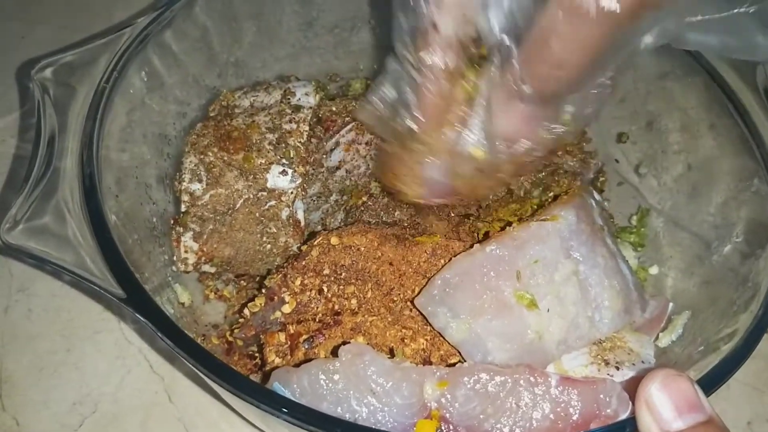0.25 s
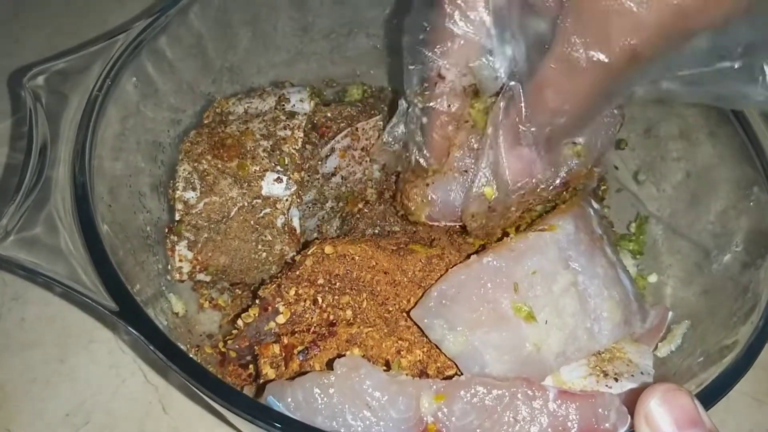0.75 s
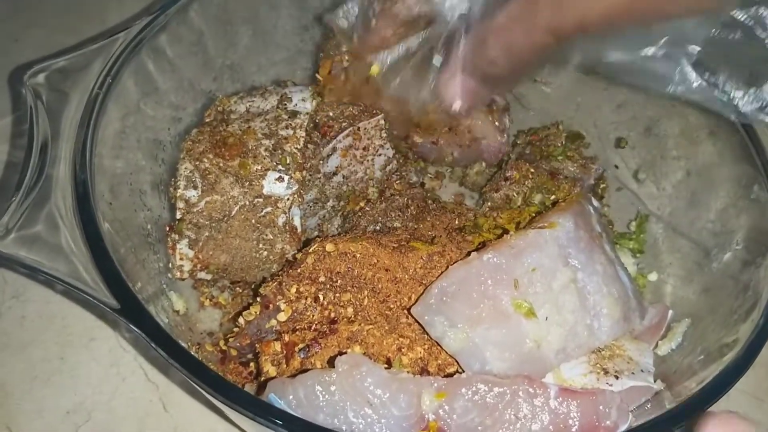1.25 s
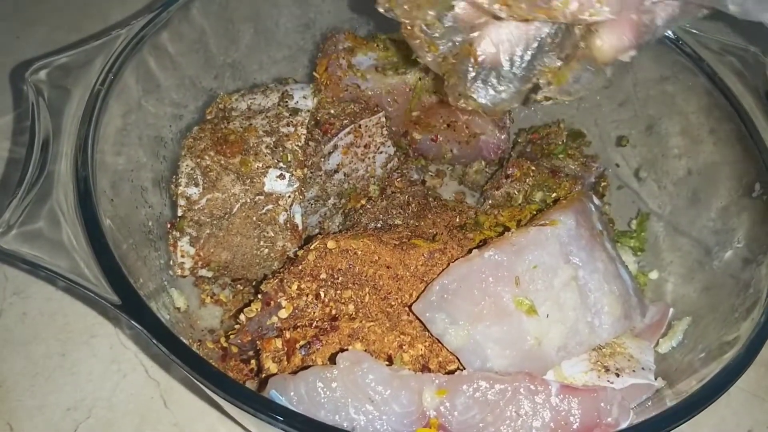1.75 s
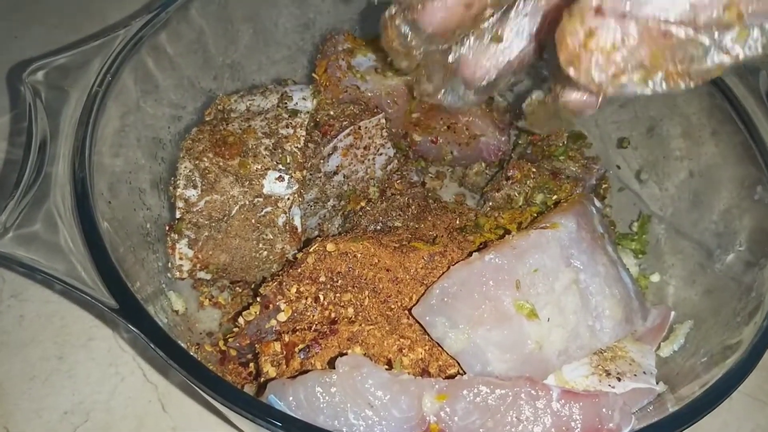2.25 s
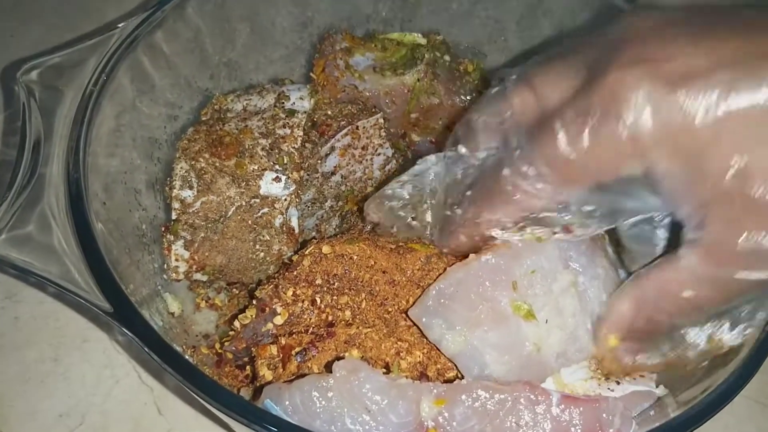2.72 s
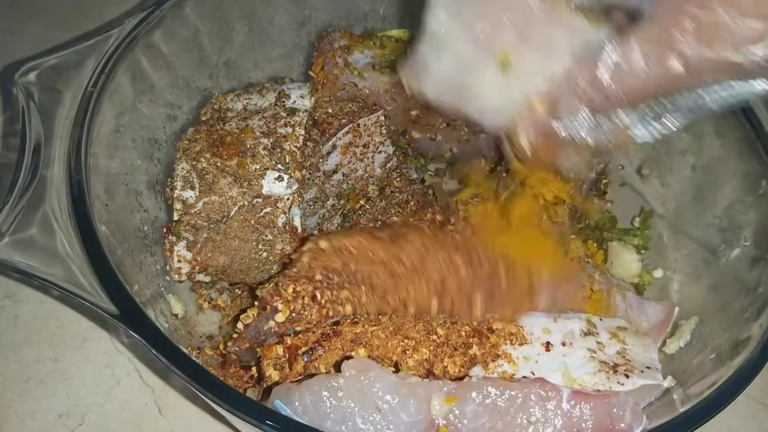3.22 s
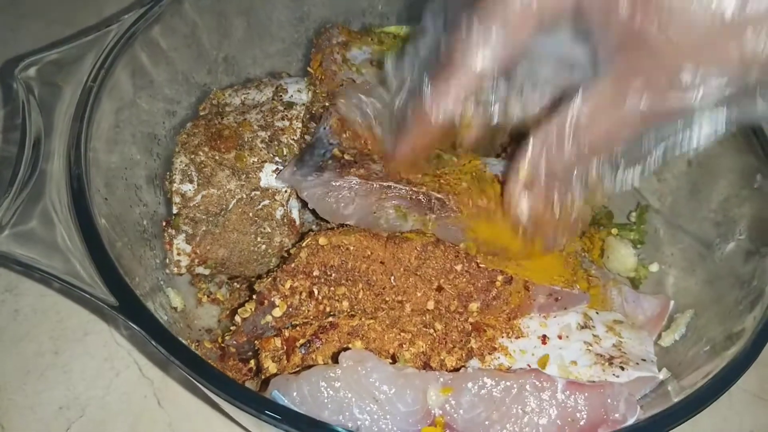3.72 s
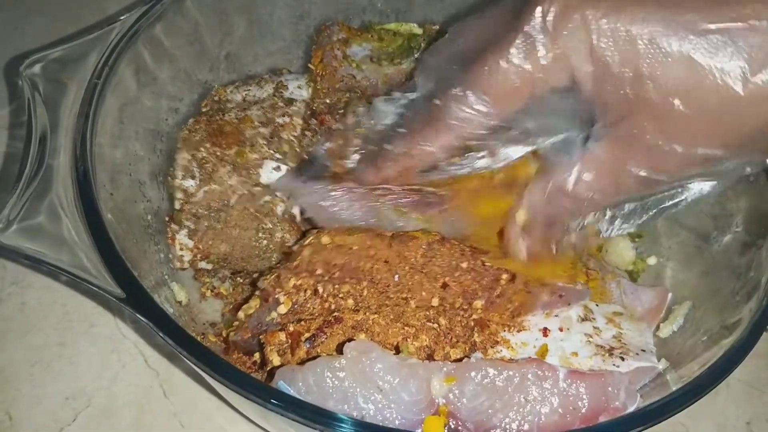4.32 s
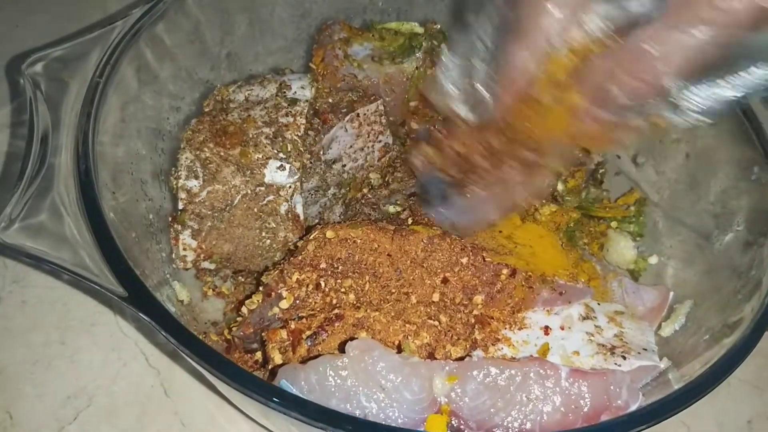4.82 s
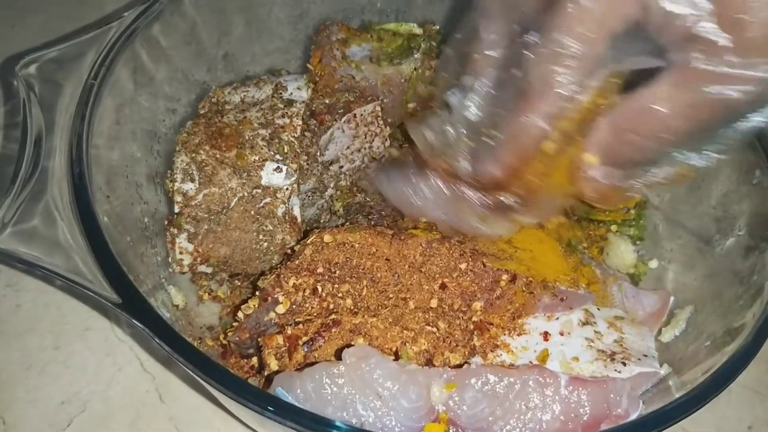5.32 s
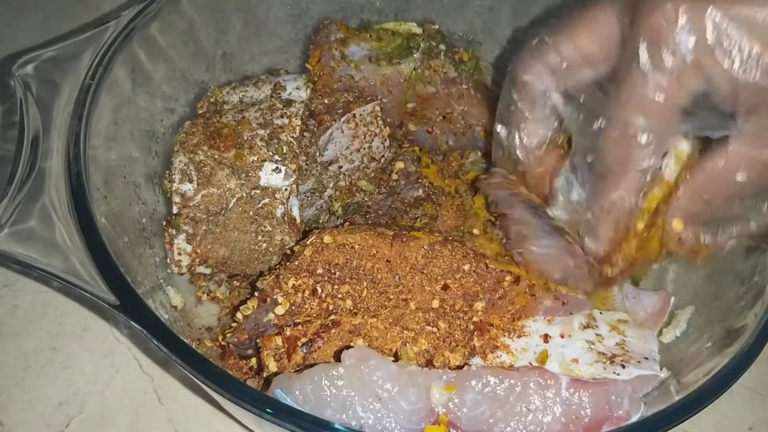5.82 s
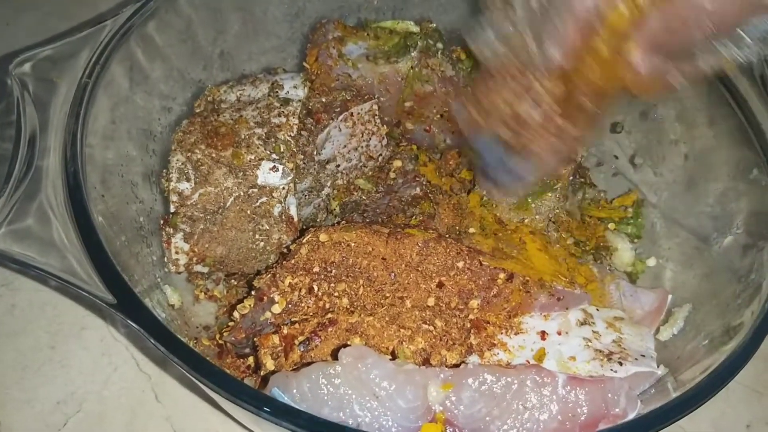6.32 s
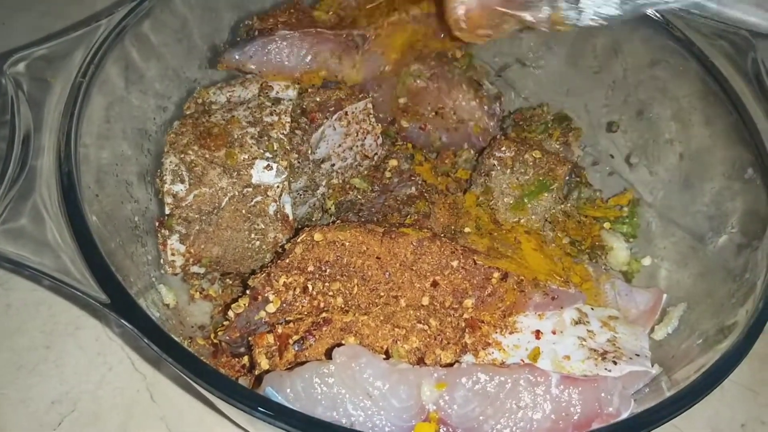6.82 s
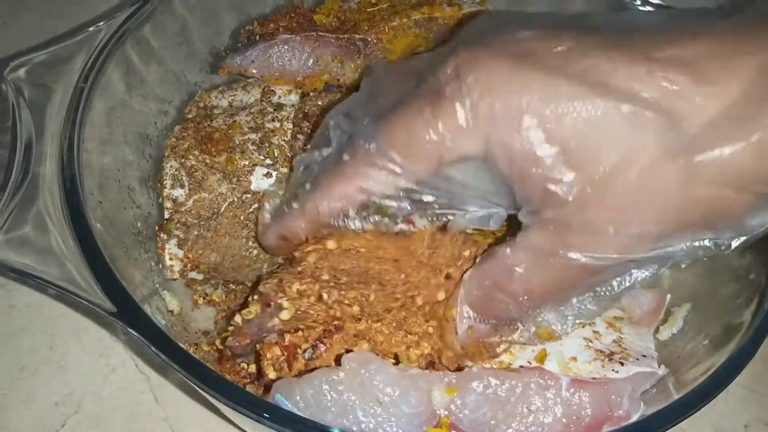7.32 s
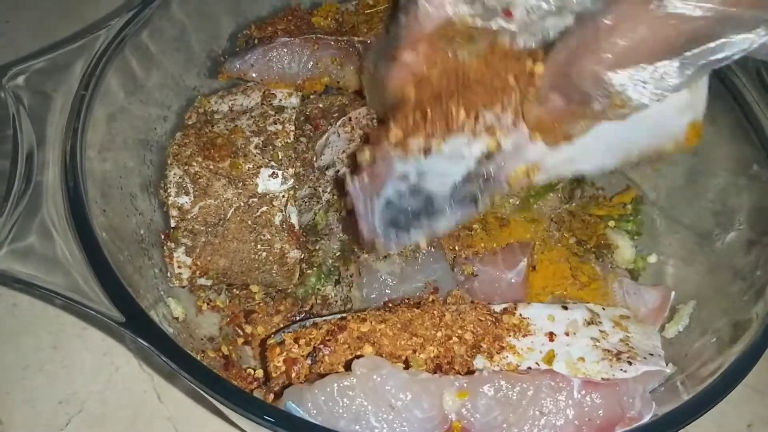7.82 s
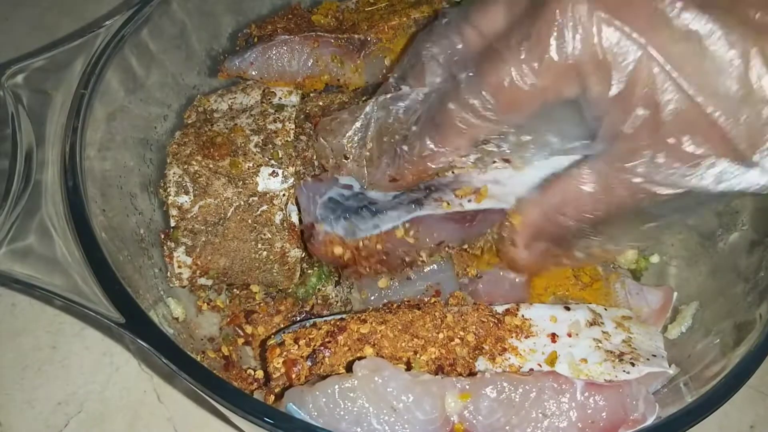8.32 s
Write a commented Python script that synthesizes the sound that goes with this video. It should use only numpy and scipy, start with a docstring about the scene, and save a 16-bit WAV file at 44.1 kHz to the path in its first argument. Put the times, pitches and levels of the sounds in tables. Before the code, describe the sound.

A hand in a thin plastic glove works close to the microphone, turning fish in dry spice in a glass bowl. The film crinkles in short, bright bursts, first sparse, then fuller after two seconds, with a few sharp ticks. A low fan hum fills the kitchen, with a faint thin hiss and a distant engine rising and falling.

```python
"""A fan hums in a kitchen over a faint rustle of film, then a gloved hand turns fish in dry spice in a glass bowl.
The thin plastic glove is close: its film buckles in thousands of random snaps that scatter in bowl and kitchen.
A few creases tick alone as short ringing sines, and a few low, narrow swells of noise come and go.
Shaped noise and wavering sines make the fan, narrow hiss a thin whine; an engine far outside rises and falls
as a firing note with its third harmonic."""
import sys
import numpy as np
from scipy import signal
from scipy.fft import rfft, irfft
from scipy.io import wavfile

SR = 44100
rng = np.random.default_rng(int(sys.argv[2]) if len(sys.argv) > 2 else 0)


def put_to_file(sound):
    """Save the sound as 16-bit audio at rate SR, in the file named by the first command-line argument."""
    columns = np.atleast_2d(sound).T  # one column per channel
    safe = np.clip(columns, -1, 1)
    whole_steps = np.round(safe * 32767)
    wavfile.write(sys.argv[1], SR, whole_steps.astype(np.int16))


N = 377055
T = np.arange(N) / SR  # seconds
HZ = np.fft.rfftfreq(N, 1 / SR) + 1e-9  # kept above zero for the logarithm
MIDDLING_DB = -44.5  # crinkle level of a middling effort


def undb(db):
    """Decibels to gain."""
    return 10 ** (np.asarray(db) / 20)


def unit(x):
    """Scale to rms 1."""
    return x / np.sqrt(np.mean(x ** 2))


def curves(rows):
    """Draw each column of a (start_s, ..) table as straight lines, sample by sample."""
    s, *columns = np.transpose(rows)
    return [np.interp(T, s, c) for c in columns]


def response(points):
    """Gain at every frequency from (pitch_hz, level_db) points, joined on a logarithmic pitch scale."""
    hz, db = np.transpose(points)
    return undb(np.interp(np.log(HZ), np.log(hz), db))


def walk(rate):
    """Smooth chance of rms 1 that heads for a new random value rate times a second."""
    return unit(np.interp(T * rate, np.arange(4096), rng.standard_normal(4096)))


def ring(spectrum, hz, width):
    """Sound of a spectrum through a resonance with steep, bell-shaped skirts; rms 1."""
    return unit(irfft(spectrum * np.exp(-((HZ - hz) / width) ** 2), N))


def fan():
    """Moving air rings the room's low resonances; the motor's tones swell and waver on top."""
    # colour of the air noise before the room rings: pitch_hz [Hz], level_db [dB, relative]
    air_colour = [(20, -25), (45, -7.5), (70, -3), (95, -1), (190, -1.5), (215, -8), (270, -2), (325, -2),
                  (400, -7.5), (480, -19), (900, -20.5), (1300, -27.5), (4000, -31), (15000, -54)]
    # room resonances: pitch_hz [Hz], width_hz [Hz, where half the dB boost is left], boost_db [dB]
    room_modes = [(54, 4.9, 0.5), (102, 4.7, 8), (138, 7, -2.5), (167.2, 22, 2.5), (183.2, 7.3, 5.5),
                  (263.2, 6.2, 7), (280.4, 9, 3), (290.6, 8.7, 4), (312, 15, 1), (350, 6.8, -1),
                  (378, 9.4, 0), (417, 10, -1), (674, 41, 6.5), (1590, 68, 6.5)]
    # motor tones, before they swell: pitch_hz [Hz], level_db [dB rms]
    motor_tones = [(61.8, -60.5), (123.7, -55.5), (200, -62.5), (232, -62.5), (309.2, -57), (494, -70),
                   (800.5, -74)]
    air_db = -42.5  # rms of the part that both sides share

    gain = response(air_colour)
    for hz, width, db in room_modes:
        gain = gain * undb(db / (1 + (2 * (HZ - hz) / width) ** 2))
    # the bass is nearly alike at both microphones, the treble spreads wide
    width = response([(40, -14), (150, -19.5), (320, -13.5), (600, -3.5), (1500, 1.0), (4000, 1.0)])
    noise = rfft(rng.standard_normal((2, N)))
    mid, side = irfft(noise * gain * [np.ones(len(HZ)), width], N)
    air = (mid + side * np.array([[1], [-1]])) / np.std(mid)

    hum = 0
    for hz, db in motor_tones:
        swell = undb(db + 3.8 * walk(3.6))
        waver = 0.33 * walk(4)  # radians
        hum = hum + swell * np.sqrt(2) * np.sin(2 * np.pi * hz * T + waver)
    return air * undb(air_db) + hum


def whine():
    """Two steady, narrow bands of noise make a thin, hissy whine."""
    # bands of hiss: pitch_hz [Hz], width_hz [Hz, middle to 1/e], level_db [dB rms]
    hiss_bands = [(5350, 100, -73), (6360, 110, -68.5)]
    hiss = rfft(rng.standard_normal((2, N)))
    return sum(undb(db) * ring(hiss, hz, width) for hz, width, db in hiss_bands)


def engine():
    """Only the firing note and its third harmonic get through the walls; both swell when the engine pulls."""
    # pulls: middle_s [s], length_s [s], firing_hz [Hz], note_db [dB rms], third_harmonic_db [dB rms before waver]
    pulls = [(1.846, 0.62, 28.2, -68, -48.5), (2.597, 0.67, 31.4, -50, -52), (3.6, 0.43, 32, -55, -51),
             (5.55, .6, 28.7, -57, -46), (6.098, 0.79, 30.2, -54, -47), (7.155, 1.0, 32.5, -49, -58),
             (7.6, 0.6, 33.3, -55, -47.5), (8.4, 0.49, 30.27, -48.5, -62)]
    idle_third_db = -59  # between pulls only the third harmonic is heard

    hz, = curves([(s, rate) for s, _, rate, _, _ in pulls])
    note_power, third_power = 0, undb(idle_third_db) ** 2
    for s, length, _, note_db, third_db in pulls:
        pull = np.exp(-(2 * (T - s) / length) ** 2)
        note_power = note_power + pull * undb(note_db) ** 2
        third_power = third_power + pull * undb(third_db) ** 2
    phase = 2 * np.pi * np.cumsum(hz) / SR + 0.054 * walk(18)
    note = np.sqrt(2 * note_power) * np.sin(phase)
    third = np.sqrt(2 * third_power) * undb(1.1 * walk(5.4)) * np.sin(3 * phase)
    return note + third


def stroke(start, length):
    """Power of one rub: the fingers take hold of the film, rub in a gentle arch and let go."""
    attack_s, release_s = 0.012, 0.0098  # time constants
    arch_db = 1.5  # a stroke is fastest, and so loudest, in its middle
    from_middle = np.clip(2 * (T - start) / length - 1, -1, 1)
    arch = undb(arch_db * (1 / 3 - from_middle ** 2)) ** 2
    attack = (1 + np.tanh((T - start) / (2 * attack_s))) / 2
    release = (1 + np.tanh((start + length - T) / (2 * release_s))) / 2
    return arch * attack * release


def hand():
    """Strokes add power to the grip's rustle; gives effort and shares of broad and fine folds, all in dB."""
    # rustle between strokes, faint from the fingertips, fuller from the whole hand:
    # start_s [s], crinkle_db [dB, before fidgeting]
    grip = [(0, -49), (.15, -56.5), (.95, -55), (1.3, -53), (1.62, -60.5), (1.95, -42.5), (3.3, -42),
            (3.9, -46), (4.6, -45), (5.1, -44.5), (5.5, -47), (6.3, -45.5), (7.25, -42.5), (7.8, -44),
            (8.55, -42.3)]
    # rubs and squeezes: start_s [s], length_s [s], crinkle_db [dB, before the arch],
    # broad_slack_db and fine_taut_db [dB, relative to the middling folds]
    strokes = [(0.367, 0.056, -40, -9, 0), (0.444, .12, -44, -10.5, -3), (0.658, 0.043, -49.5, -10, 0),
               (1.03, 0.27, -43, -13, -2.5), (1.113, 0.035, -35.5, -11.5, -0.5),
               (1.675, 0.061, -45.5, -18, -2), (1.8, 0.15, -47, -12, -1.5), (1.963, 0.24, -37, -14, 0),
               (2.075, 0.044, -34, -20, 4), (2.398, 0.058, -39, -28, 0.5), (2.475, 0.13, -40, -11, -5),
               (2.662, 0.071, -36, -19.5, -1), (2.81, .052, -40.5, -9, -3), (2.98, 0.14, -40.5, -18.5, -6),
               (3.431, 0.095, -37.5, -16.5, 1), (3.561, 0.056, -40, -15.5, 0.5),
               (3.701, 0.034, -36.5, -15.5, -2), (3.987, 0.073, -41.5, -11, -1),
               (4.155, 0.078, -36.5, -11.5, -0.5), (4.264, .21, -39, -11.5, -0.5),
               (4.564, .04, -37, -18, 1.5), (4.63, 0.05, -36, -14.5, 3), (4.701, .345, -40.5, -15.5, -.5),
               (5.362, 0.034, -37, -17, -3), (5.694, 0.042, -34.5, -13, -1.5), (5.83, 0.056, -40.5, -20, 1),
               (6.013, 0.065, -35.5, -14.5, -3), (6.177, .05, -40.5, -15, -1), (6.437, 0.24, -45, -29, 3),
               (6.835, 0.044, -41.5, -13, -.5), (6.943, 0.097, -38.5, -13, -4),
               (7.087, 0.057, -37.5, -11.5, -3), (7.506, 0.16, -41.5, -16, 1.5),
               (7.9, 0.075, -37, -11.5, 1), (8.209, .068, -33.5, -13, -.5)]
    fidget_db, fidget_per_s = 1.02, 26  # small finger movements vary the rustle
    grip_broad_db, slack_db_per_db = -11.5, 0.5  # a looser grip leaves more broad folds
    grip_fine_db = 0.1

    grip_db, = curves(grip)
    grip_db = grip_db + fidget_db * walk(fidget_per_s)
    power = undb(grip_db) ** 2
    broad = power * undb(grip_broad_db - slack_db_per_db * (grip_db - MIDDLING_DB)) ** 2
    fine = power * undb(grip_fine_db) ** 2
    for start, length, db, broad_db, fine_db in strokes:
        rub = undb(db) ** 2 * stroke(start, length)
        power = power + rub
        broad = broad + rub * undb(broad_db) ** 2
        fine = fine + rub * undb(fine_db) ** 2
    return 10 * np.log10([power, broad / power, fine / power])


def snaps(per_second, spread_db):
    """Energy of buckling snaps at random moments, many small and a few large; mean 1."""
    happens = rng.random(N) < per_second / SR
    size = undb(spread_db * np.minimum(rng.exponential(size=N), 3.5))
    energy = happens * size ** 2 / per_second  # more snaps share the same energy
    return energy / energy.mean()


def fade(energy, t60):
    """Spread energy over an exponential tail that falls 60 dB in t60 seconds."""
    keep = np.exp(-np.log(1e6) / (t60 * SR))
    return signal.lfilter([1 - keep], [1, -keep], energy)


def scatter(energy, snap_t60, bowl_t60, bowl_db, room_t60, room_db):
    """Amplitude of snaps with their reflections off the glass and the kitchen's tail."""
    snap = fade(energy + 1e-18, snap_t60)
    glass = fade(energy * undb(bowl_db) ** 2 + 1e-18, bowl_t60)
    kitchen = fade(energy * undb(room_db) ** 2 + 1e-18, room_t60)
    return np.sqrt(snap + glass + kitchen)


def shifting_colour(x, gain, drift_s):
    """Three delayed copies with randomly wandering lags make the crinkle's colour keep shifting."""
    out = x
    for lag in (.0007, .0019, .0037):  # seconds
        out = out + gain * np.interp(T - lag - drift_s * walk(7), T, x)
    return unit(out)


def glove():
    """The film buckles in little avalanches, thicker and louder as the hand presses, and its folds ring."""
    # bands in which the folds ring, broad folds first:
    # pitch_hz [Hz], width_hz [Hz, middle to 1/e], level_db [dB, before the folds vary]
    film_bands = [(840, 500, -5.5), (1786, 390, -4.5), (2318, 307, -7.5), (2830, 440, -15.5),
                  (3720, 775, -13.5), (4870, 1000, -11.5), (5950, 910, -16), (7134, 930, -10.5),
                  (8840, 1150, -12.5), (10770, 1450, -10.5), (12900, 1340, -10.5), (15460, 1560, -12)]
    broad_wander_db, fine_wander_db = 0.5, 0.55  # the mix of folds drifts as the glove shifts

    effort_db, broad_db, fine_db = hand()
    broad_db = broad_db + broad_wander_db * walk(8.9)
    fine_db = fine_db + fine_wander_db * walk(8)
    rate = 3500 * undb(.6 * (effort_db - MIDDLING_DB))  # snaps per second
    avalanches = undb(3.3 * walk(80) + 2.1 * walk(300))
    energy = snaps(rate, spread_db=4.0) * avalanches
    crackle = unit(scatter(energy, snap_t60=0.0015, bowl_t60=0.01, bowl_db=-8, room_t60=0.21, room_db=1.5))
    # every snap starts from another spot, so it reaches each microphone by its own paths
    both_paths = rng.standard_normal((2, N))
    film = rfft([shifting_colour(crackle * paths, gain=0.41, drift_s=0.000227) for paths in both_paths])
    out = 0
    for hz, width, db in film_bands:
        broad = np.interp(hz, [2400, 3300], [1, 0])
        fine = np.interp(hz, [7000, 10500], [0, 1])
        # folds of each size come and go; the broad ones are few, so they are the most uneven
        unevenness = np.clip(3500 / hz, .4, 1.3)
        patchy_db = unevenness * (1.63 * walk(28) + 1.28 * walk(130))
        lean_db = .5 * hz / 12000 * np.array([[-1], [1]])  # the bright side of the glove faces right
        shared = 130 / hz  # long waves reach both microphones more alike
        band = ring(film + shared * film[::-1], hz, width)
        band_db = db + broad * broad_db + fine * fine_db + patchy_db
        out = out + band * undb(band_db) * undb(lean_db)
    return out * undb(effort_db)


def ticks():
    """A stiff crease flips over: a millisecond of ringing and a faint splash of reflections."""
    # single creases that snap through: start_s [s], level_db [dB, starting amplitude of the ring], pitch_hz [Hz]
    creases = [(0.7155, -40, 4580), (0.908, -39.5, 5420), (1.7234, -37, 5550), (2.2372, -26, 5600),
               (2.9814, -34, 3690), (6.2204, -33, 7380), (7.5684, -28.5, 8470)]
    out, t = np.zeros((2, N)), T[:1000]
    for s, db, hz in creases:
        start = int(s * SR)
        snap = np.sin(2 * np.pi * (hz * t + rng.random((2, 1)))) * np.exp(-t / .0006)
        splash = .25 * rng.standard_normal((2, len(t))) * np.exp(-t / .003)
        out[:, start:start + len(t)] += undb(db) * (snap + splash)
    return out


def low_swells():
    """Short, soft swells of low, narrow noise."""
    # swells: middle_s [s], level_db [dB rms before the envelope shapes it], pitch_hz [Hz],
    # length_s [s, middle to 1/e]
    swells = [(2.172, -43, 169, 0.079), (3.665, -46, 322, 0.079), (4.155, -50.5, 382, 0.076),
              (4.667, -40.5, 99, 0.065), (8.28, -42.5, 280, 0.067)]
    noise = rfft(rng.standard_normal(N))
    out = 0
    for s, db, hz, length in swells:
        envelope = np.exp(-((T - s) / length) ** 2)
        out = out + undb(db) * ring(noise, hz, hz / 6) * envelope
    return out


def scene():
    """The glove close by, over the hum of the kitchen."""
    return fan() + whine() + engine() + glove() + ticks() + low_swells()


def record(dry):
    """The recorder cuts the top steeply."""
    top_hz = 15750
    return signal.sosfilt(signal.ellip(12, .1, 70, top_hz, fs=SR, output="sos"), dry)


dry = scene()
out = record(dry)
put_to_file(out)
```